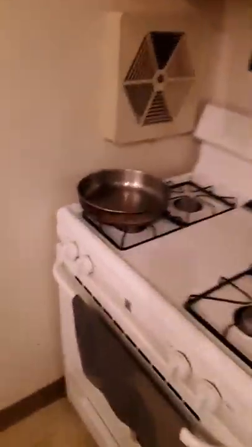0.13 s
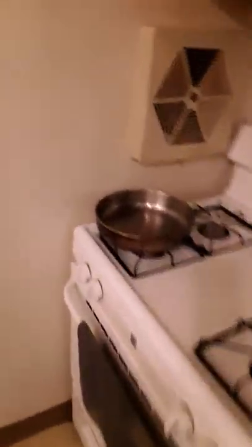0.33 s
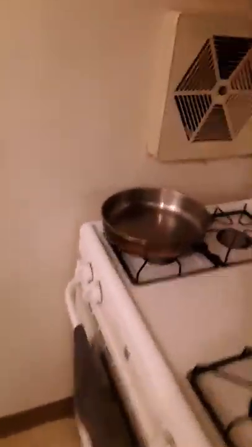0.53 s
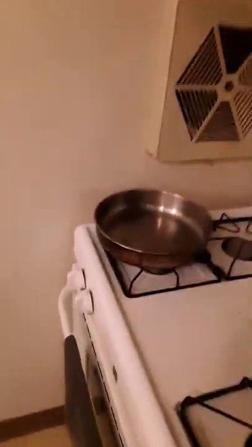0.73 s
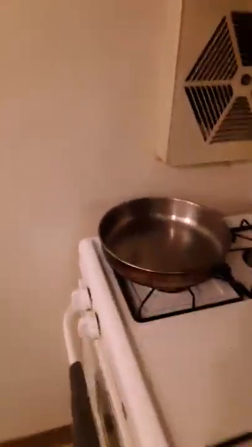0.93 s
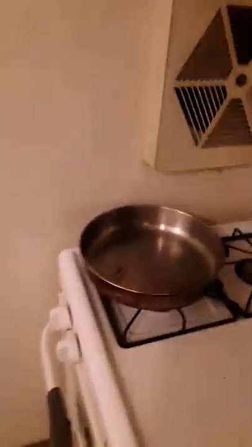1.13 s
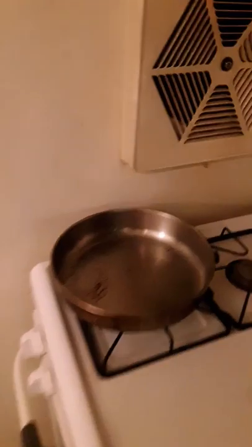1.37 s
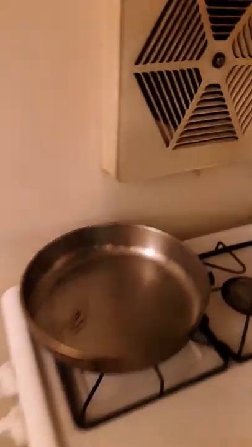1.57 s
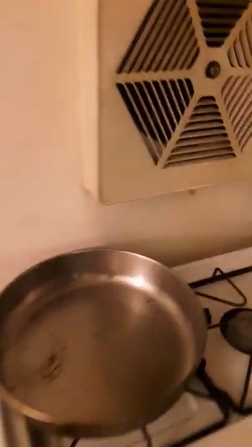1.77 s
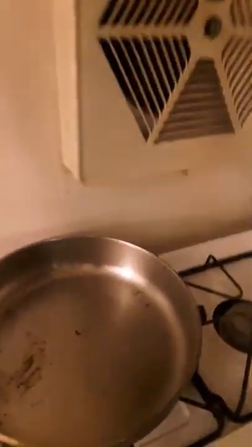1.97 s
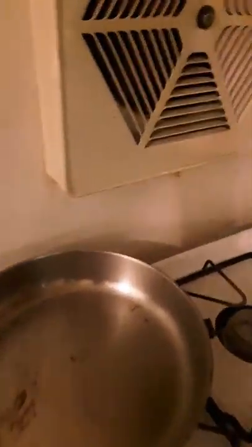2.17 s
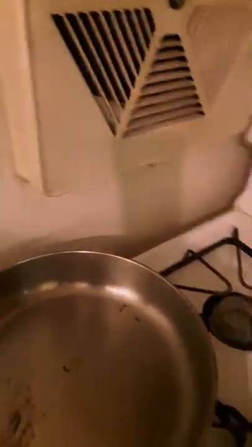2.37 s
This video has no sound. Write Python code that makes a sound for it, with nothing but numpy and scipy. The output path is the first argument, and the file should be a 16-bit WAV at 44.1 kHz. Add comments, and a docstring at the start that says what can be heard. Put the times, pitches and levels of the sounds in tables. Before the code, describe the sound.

Rough broom-like sweeping near a stove: the tail of a light brush, then four slap-and-scrape strokes with dull knocks and lighter rubs between, heard close in stereo in a hard-walled kitchen over quiet hiss and hum.

```python
"""A small hard-walled kitchen on two microphone ports: room tone and a faint low hum that climbs in pitch.
The tail of a light brush opens the take, then come four brisk strokes of stiff bristles, probably a broom.
Each lands with a slap, drags, swells and deepens as it lifts; a lighter brush follows on the way back.
Soft bumps come with the work. Rubs are showers of tiny flicks, slaps and bumps are decaying noise,
the hum is three sines; late in the take the direct sound swings to the centre."""
import sys
import numpy as np
from scipy import signal
from scipy.fft import rfft, irfft
from scipy.io import wavfile
from scipy.ndimage import map_coordinates

SR = 44100
rng = np.random.default_rng(int(sys.argv[2]) if len(sys.argv) > 2 else 0)


def int16_out(signal):
    """Quantize to a 16-bit WAV file."""
    q = np.round(np.clip(np.atleast_2d(signal).T, -1, 1) * 32767)
    wavfile.write(sys.argv[1], SR, q.astype(np.int16))


N = 110250  # 2.5 s
T, HZ = np.arange(N) / SR, np.fft.rfftfreq(N, 1 / SR)


def amp(db):
    """Decibels to gain."""
    return 10 ** (np.asarray(db) / 20)


def unit(x):
    """Scales to rms 1."""
    return x / np.sqrt(np.mean(x ** 2) + 1e-20)


def read(points, hz):
    """Reads a table on a log-frequency axis."""
    f, value = np.transpose(points)
    return np.interp(np.log(hz + 1), np.log(f + 1), value)


def colour(x, gain):
    """Filters by a gain per frequency."""
    return irfft(rfft(x) * gain, N)


def hump(hz, centre_hz, octaves):
    """A bell of height 1 on a log-frequency axis."""
    return np.exp(-.5 * (np.log2((hz + 1) / centre_hz) / octaves) ** 2)


def shaped(x, envelope):
    """Lays an envelope on a noise, keeping the envelope's energy."""
    enveloped = x * envelope
    return enveloped * np.linalg.norm(envelope) / np.linalg.norm(enveloped)


# Colour of the room tone, relative: [frequency_hz, density_db (per Hz)]
FLOOR_COLOUR = [(20, -22), (60, -4), (110, -3), (220, -6), (340, -14.5), (650, -22), (1300, -24.5),
                (1950, -12), (2600, -24), (5000, -17.5), (10000, -20.5), (15000, -29.5)]
# Likeness of the room tone at the two ears: [frequency_hz, likeness (0 to 1)]
EAR_LIKENESS = [(60, 0.72), (250, 0.72), (640, 0.48), (1400, 0)]
FLOOR_START_DB, FLOOR_RISE_DB_PER_S = -66.5, 1.5


def room_tone():
    """Slowly growing noise: the faint rumble is partly alike in both ears, the hiss is wide."""
    first, second = rng.standard_normal((2, N))
    same = np.clip(read(EAR_LIKENESS, HZ), -1, 1)
    other_ear = colour(first, same) + colour(second, np.sqrt(1 - same ** 2))
    tone = unit(colour(np.array([first, other_ear]), amp(read(FLOOR_COLOUR, HZ))))
    return amp(FLOOR_START_DB + FLOOR_RISE_DB_PER_S * T) * tone


# Path of the hum: [time_s, pitch_hz, level_db, level_at_1.5_times_pitch_db, octave_level_db]
HUM_PATH = [(0, 103.1, -80, -94, -80.5), (.55, 103.3, -80.5, -85, -75.5), (0.821, 107.8, -76.5, -78.5, -67),
            (1.199, 111.9, -76.5, -108, -90), (1.698, 120, -63, -83, -73.5), (2.2, 122.5, -65, -68.5, -80),
            (2.5, 126.6, -68.5, -75, -75)]
HUM_WAVER_DB = 1  # rms


def hum():
    """A faint low hum, perhaps a distant motor: three wavering sines slowly rise in pitch together."""
    s, pitch_hz, *levels_db = np.transpose(HUM_PATH)
    turns = np.cumsum(np.interp(T, s, pitch_hz)) / SR
    out = 0
    for multiple, db in zip((1, 3 / 2, 2), levels_db):
        waver = unit(colour(rng.standard_normal(N), np.exp(-HZ / 6)))
        level = amp(np.interp(T, s, db) + HUM_WAVER_DB * waver)
        sine = np.sin(2 * np.pi * (multiple * turns + rng.random()))
        out = out + level * np.sqrt(2) * sine
    return out


# Decay of the kitchen: [frequency_hz, time_to_fall_60_db_s]
KITCHEN_DECAY = [(100, 0.52), (500, 0.35), (1500, 0.48), (1950, 0.45), (2400, 0.42), (4000, 0.4),
                 (9000, 0.37), (15000, 0.36)]
EARLY_DB, EARLY_S = 4, 0.013  # extra early reflections and how fast they fade


def kitchen(x):
    """Dense early reflections and a short tail off hard walls, different at each ear."""
    t = T[:SR * 3 // 4]
    sparse = rng.random((2, len(t))) < .2
    taps = rng.standard_normal((2, len(t))) * sparse * (t > .001)
    early = 1 + amp(EARLY_DB) * np.exp(-t / EARLY_S)
    hz, frame_s, z = signal.stft(taps * early, SR, nperseg=256)
    decay = np.exp(-np.log(1000) * frame_s / read(KITCHEN_DECAY, hz)[:, None])
    tail = signal.istft(z * decay, SR, nperseg=256)[1]
    tail = tail / np.linalg.norm(tail, axis=1, keepdims=True)
    return signal.fftconvolve(x[None], tail, axes=1)[:, :N]


PATH_CHANGE_S = .01  # time from one reflection pattern to the next


def moving_in_kitchen(x, count=10):
    """The bristles travel, so the sound fades from one reflection pattern to the next, in a cycle."""
    place = T / PATH_CHANGE_S
    out = 0
    for k in range(count):
        away = abs((place - k + count / 2) % count - count / 2)
        out = out + kitchen(x * np.cos(np.pi / 2 * np.minimum(away, 1)))
    return out


# Soft bumps, levels before the rise and the room: [start_s, level_db, decay_s, centre_hz]
SOFT_BUMPS = [(0.159, -62.5, 0.033, 238), (0.316, -57.5, 0.064, 309), (.33, -55, 0.039, 101),
              (.772, -56.5, 0.076, 744), (0.774, -59, 0.042, 410), (1.022, -57.5, 0.022, 100),
              (1.201, -63, 0.029, 620), (1.431, -46.5, 0.021, 880), (1.437, -53.5, 0.059, 340),
              (1.442, -54, 0.055, 160), (1.629, -59, 0.18, 99), (1.64, -63, 0.11, 317),
              (1.952, -47.5, 0.048, 158), (1.954, -52.5, 0.049, 390), (1.955, -55.5, 0.054, 726),
              (2.147, -58, 0.04, 387), (2.151, -51, 0.026, 857)]
BUMP_RISE_S, BUMP_LOW_HZ = 0.0027, 56
BUMP_WIDTH_HZ, BUMP_WIDTH_SHARE = 86, 0.047  # the half width grows with the centre


def bump(start, db, decay, hz):
    """A dull, pitchless knock: a band of noise that rises fast and dies away."""
    t = np.maximum(T - start, 0)
    half_width_hz = BUMP_WIDTH_HZ + BUMP_WIDTH_SHARE * hz
    band = 1 / (1 + ((HZ - hz) / half_width_hz) ** 4)
    band = band / (1 + (BUMP_LOW_HZ / (HZ + 1)) ** 4)
    envelope = (1 - np.exp(-t / BUMP_RISE_S)) * np.exp(-t / decay)
    return amp(db) * shaped(colour(rng.standard_normal(N), band), envelope)


# Colour of the rasp, relative: [frequency_hz, level_db]
RASP_COLOUR = [(200, -25), (500, -4), (900, -6), (1450, -8), (1900, -1.5), (2400, -2.5), (3700, 2),
               (4800, -1.5), (6000, -3.5), (8000, -5.5), (11000, -13.5), (14000, -20), (16000, -29.5)]
# Resonances of the bristles and what they rub: [centre_hz, width_hz, boost_db]
RUB_RESONANCES = [(897, 250, 2.5), (1180, 90, 0), (2000, 200, 2.5), (3880, 130, -2), (4190, 40, -3)]


def rasp_db(hz):
    """Spectrum of rubbed bristles with its resonances."""
    peaks = sum(db / (1 + (2 * (hz - f) / width) ** 2) for f, width, db in RUB_RESONANCES)
    return read(RASP_COLOUR, hz) + peaks


EDGE_ORDER, LEAK_DB = 3.8, -27


def low_edge(hz, edge_hz):
    """Steep roll-off under the edge, with a little leakage."""
    return 1 / np.sqrt(1 + (edge_hz / (hz + 1)) ** (2 * EDGE_ORDER)) + amp(LEAK_DB)


FLICKS_PER_S, FLICK_SPREAD_DB, HISS_SHARE = 9000, 3.4, .5
# a broad resonance rides just above the low edge
SCRAPE_DB, SCRAPE_RATIO, SCRAPE_OCT = 1, 1.58, 0.32


def rub(curve):
    """Thousands of bristle flicks a second whose strength and colour follow the stroke."""
    s, db, bright, edge_hz = np.transpose(curve)
    sizes = amp(FLICK_SPREAD_DB * np.minimum(rng.exponential(1, N), 5))
    flicks = sizes * rng.choice([-1., 1.], N) * (rng.random(N) < FLICKS_PER_S / SR)
    source = unit(flicks) + HISS_SHARE * rng.standard_normal(N)
    hz, t, z = signal.stft(source, SR, nperseg=512)
    hz, edge = hz[:, None], np.interp(t, s, edge_hz)
    tilt_db = np.interp(t, s, bright) * np.log2((hz + 500) / 4000)
    scrape_db = SCRAPE_DB * hump(hz, SCRAPE_RATIO * edge, SCRAPE_OCT)
    gain = amp(rasp_db(hz) + tilt_db + scrape_db) * low_edge(hz, edge)
    # even out each moment, so that colour does not change the level
    gain = gain / np.sqrt(np.mean(gain ** 2, axis=0))
    rasp = signal.istft(z * gain, SR, nperseg=512)[1][:N]
    touching = (T >= s[0]) * (T <= s[-1])
    return unit(rasp) * amp(np.interp(T, s, db)) * touching


# Light brushes between strokes, peak levels before the room:
# [start_s, length_s, level_db, brightness_db_per_octave, low_edge_at_start_hz, low_edge_at_end_hz]
LIGHT_BRUSHES = [(-.06, 0.081, -37, -0.5, 1090, 800), (0.475, 0.09, -50.5, 1.5, 1730, 1200),
                 (1.115, 0.079, -41.5, -5, 1760, 1560), (1.183, 0.061, -43, 1.5, 1220, 790),
                 (1.759, 0.091, -40.5, 1, 1500, 1110), (2.355, 0.096, -57.5, -2.5, 1850, 1400)]
BRUSH_ARCH = 0.77  # power of the sine arch


def brush(start, length, db, bright, from_hz, to_hz):
    """A light rub that swells and fades in one arch while it deepens."""
    u = np.linspace(.01, .99, 25)
    arch_db = BRUSH_ARCH * 20 * np.log10(np.sin(np.pi * u))
    edge_hz = from_hz * (to_hz / from_hz) ** u
    return rub(np.transpose([start + length * u, db + arch_db, bright + 0 * u, edge_hz]))


# Slaps and snaps of the bristles, levels before the low cut and the room:
# [start_s, level_db, decay_s, ring_hz, ring_boost_db]
BRISTLE_SLAPS = [(.1375, -32.5, 0.0082, 4500, 24), (0.768, -26, 0.0026, 1948, 19),
                 (.818, -27.5, 0.0069, 1770, 9.5), (.834, -24.5, 0.0025, 2560, 10),
                 (1.4325, -20.5, 0.0035, 2860, 6), (1.501, -21, 0.0029, 2503, 24),
                 (1.951, -14.5, 0.0019, 4300, 3), (1.956, -23, 0.025, 4640, 6.5),
                 (2.134, -27, 0.006, 3300, 4)]
SLAP_RING_OCT, SLAP_EDGE_HZ = .14, 1650


def slap(start, db, decay, ring_hz, ring_db, dull_hz=6000):
    """Many bristles strike at once and ring briefly: decaying noise with one boosted band."""
    t = np.maximum(T - start, 0)
    ring = ring_db * hump(HZ, ring_hz, SLAP_RING_OCT)
    gain = amp(rasp_db(HZ) + ring) / np.hypot(1, HZ / dull_hz)
    crack = shaped(colour(rng.standard_normal(N), gain), (t > 0) * np.exp(-t / decay))
    low_cut = signal.butter(3, SLAP_EDGE_HZ, "high", fs=SR, output="sos")
    return amp(db) * signal.sosfilt(low_cut, crack)


# One curve per stroke, levels before the room:
# [time_s, level_db, brightness_db_per_octave, low_edge_hz]
BROOM_STROKES = [
    [(.137, -30.5, 0, 1600), (.195, -30.5, -2, 1460), (.208, -19.5, 0, 1570), (.225, -23.5, 1, 1470),
     (.252, -20.5, 0, 1210), (.272, -25.5, 3, 830), (.295, -34.5, 1, 735), (.338, -50, 3, 400),
     (.37, -59.5, -21, 300)],
    [(.768, -28, 1, 1370), (.81, -40.5, 0, 1500), (.88, -34, 2, 1570), (.902, -26.5, 2.5, 1580),
     (.94, -28.5, 2.5, 1500), (.97, -34, 1, 970), (.99, -47.5, -6, 552), (1.04, -81, 9, 392)],
    [(1.431, -28, -1, 1250), (1.465, -35.5, 0, 1500), (1.495, -27, -3.5, 1840), (1.54, -30.5, 1.5, 1580),
     (1.588, -26, 0, 1280), (1.62, -35.5, -1, 694), (1.64, -54, -5, 554), (1.68, -65, 9, 399)],
    [(1.95, -36, -1, 1360), (1.995, -32, -1.5, 1230), (2.05, -38.5, -6.5, 1670), (2.11, -44.5, -2.5, 1820),
     (2.14, -34, -0.5, 1600), (2.17, -39, 3.5, 736), (2.22, -54.5, -10.5, 480)],
]


def bristle_work():
    """The strokes, the lighter brushes between them and the slaps, close and without the room."""
    strokes = sum(rub(curve) for curve in BROOM_STROKES)
    brushes = sum(brush(*row) for row in LIGHT_BRUSHES)
    return strokes + brushes + sum(slap(*row) for row in BRISTLE_SLAPS)


# The direct sound swings to the centre as the microphone turns: [time_s, left_ear_lag_s]
LEFT_EAR_LAG = [(1.5, .00039), (1.9, 0)]
DIRECT_DB, BUMP_ROOM_DB = -6, -8  # direct bristles; reflections of the bumps


def scene():
    """Bristles and bumps in the kitchen, over hum and room tone."""
    background = room_tone() + hum()
    bumps = sum(bump(*row) for row in SOFT_BUMPS)
    bumps_in_room = bumps + amp(BUMP_ROOM_DB) * kitchen(bumps)
    bristles = bristle_work()
    lag_s = np.interp(T, *np.transpose(LEFT_EAR_LAG))
    left = map_coordinates(bristles, [(T - lag_s) * SR])
    broom = amp(DIRECT_DB) * np.array([left, bristles]) + moving_in_kitchen(bristles)
    return background + bumps_in_room + broom


# Colour difference of the two microphone ports: [frequency_hz, left_minus_right_db]
PORT_BALANCE = [(100, 1), (500, 2.5), (1900, -0.5), (4200, 0.5), (6200, -2), (7200, 3), (8300, -3),
                (11000, -3.5), (15000, -1.5)]
CUTOFF_HZ = 16000


def record(dry):
    """The two microphone ports differ in colour; then the band limit."""
    tilt_db = read(PORT_BALANCE, HZ) / 2
    heard = colour(dry, amp([tilt_db, -tilt_db]))
    band_limit = signal.firwin(511, CUTOFF_HZ, window=("kaiser", 9), fs=SR)
    return signal.oaconvolve(heard, band_limit[None], "same")


dry = scene()
out = record(dry)
int16_out(out)
```